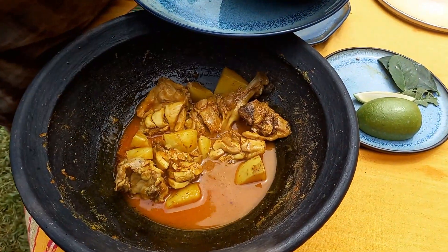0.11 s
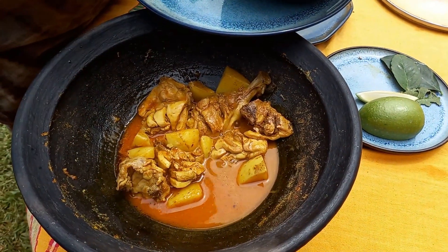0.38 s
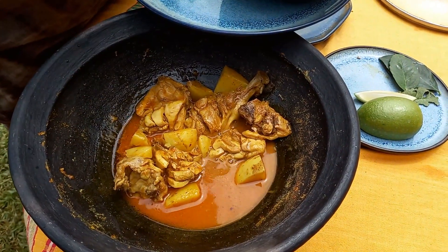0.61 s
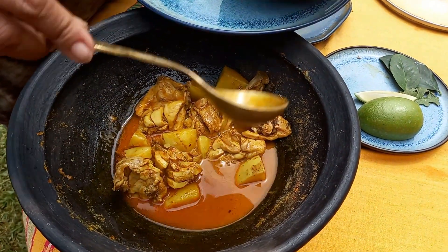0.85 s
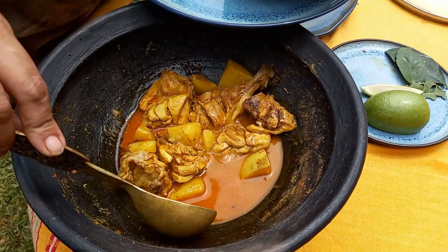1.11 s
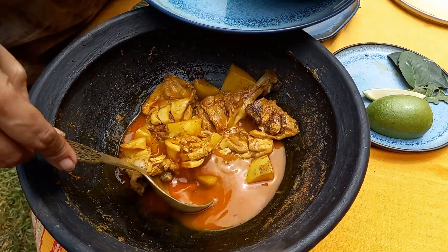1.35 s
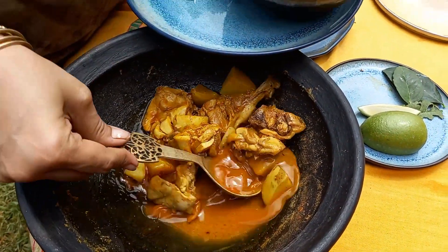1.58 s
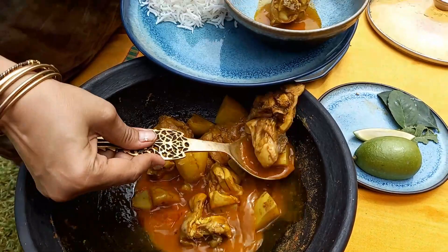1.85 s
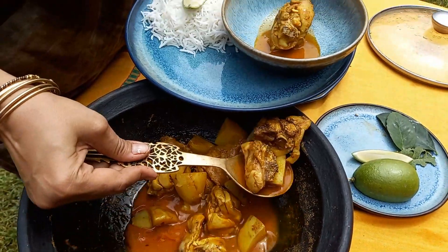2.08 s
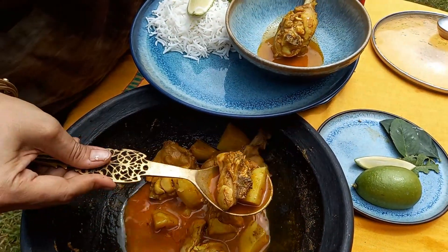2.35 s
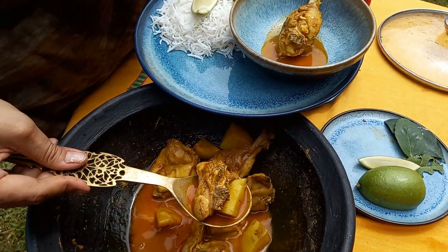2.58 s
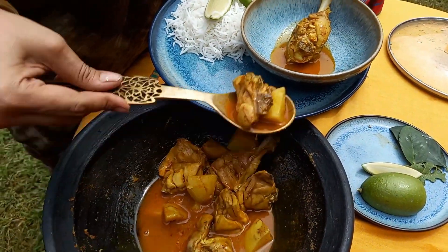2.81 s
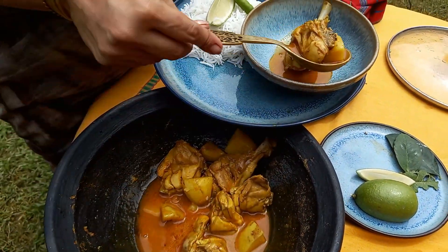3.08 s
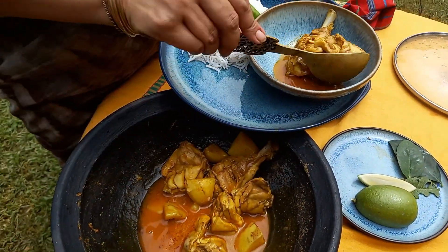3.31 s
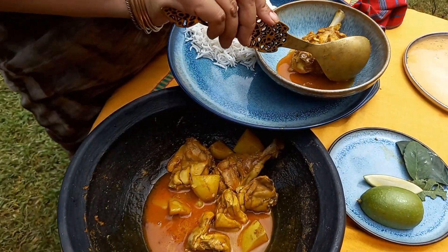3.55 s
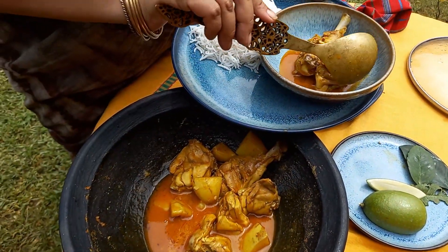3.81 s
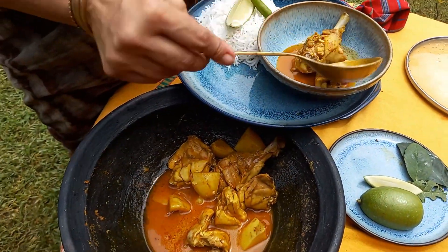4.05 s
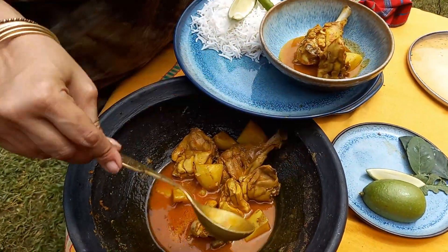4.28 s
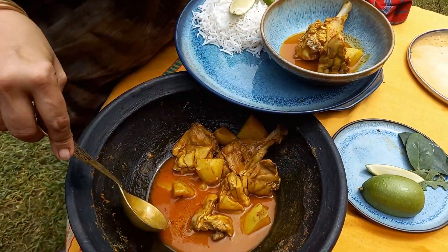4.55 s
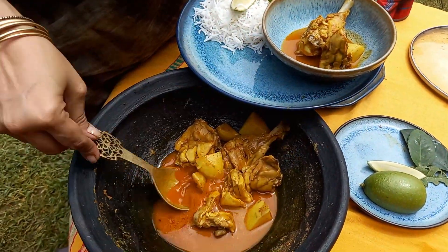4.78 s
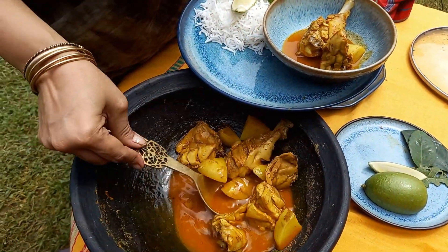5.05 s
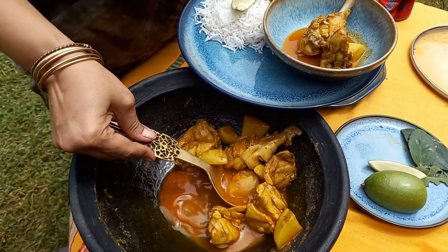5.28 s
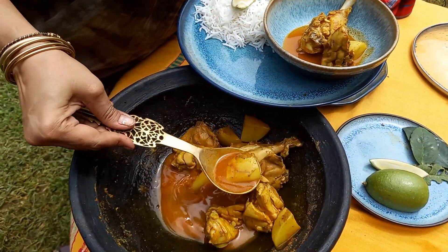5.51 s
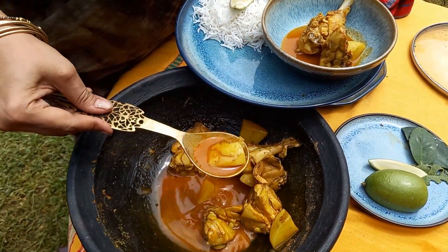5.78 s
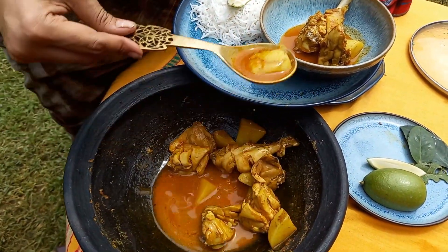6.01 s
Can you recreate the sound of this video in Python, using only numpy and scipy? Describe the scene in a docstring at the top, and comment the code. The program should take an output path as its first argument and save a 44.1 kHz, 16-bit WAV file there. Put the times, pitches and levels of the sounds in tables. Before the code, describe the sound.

A dish clunks down, then a metal ladle knocks and scrapes in a heavy clay pot outdoors, over pulsing cicadas and a late falling bird whistle.

```python
"""A brass ladle knocks and scrapes in a clay pot, close by on a garden table: blows and grit ring its modes.
A dish is set down beside it, ringing modes of its own; sauce and bangles tick and the ladle slips with
short plops, all brief tones. Cloth rustles as crackling hiss, a bird whistles and falls as gliding sines,
faint rough notes sound, and cicadas pulse as three bands of buzzing noise. Far off, a low throb of
sagging tones swells over the quiet noise of the air."""
import sys
import numpy as np
from scipy import signal
from scipy.fft import rfft, irfft, next_fast_len
from scipy.io import wavfile
from scipy.ndimage import uniform_filter1d

SR = 44100
rng = np.random.default_rng(int(sys.argv[2]) if len(sys.argv) > 2 else 0)


def generate_wav(sig):
    """Save sig (samples, or channels by samples) to the path in sys.argv[1] as 16-bit PCM at SR."""
    pcm = np.round(np.clip(np.atleast_2d(sig).T, -1, 1) * 32767).astype(np.int16)
    wavfile.write(sys.argv[1], SR, pcm)


def level_to_linear(level):
    """Convert decibel levels to linear amplitude factors, elementwise."""
    exponent = np.asarray(level, float) / 20
    return 10 ** exponent


N = 270681

# Levels are relative settings, ahead of each source's waver and gain and of the microphone.
# clay pot with the ladle on it, undamped: pitch_hz, level_db, t60_s
POT_MODES = [(356, -14, 0.1), (563.6, -2.5, 0.057), (666, 2.5, 0.041), (825, -7, 0.091), (1240, -8, 0.042),
             (1405, -7.5, 0.029), (1900, -7, 0.049), (1993, -3, 0.052), (2214, 2, 0.029), (2340, 2, 0.029),
             (2400, 1, 0.028), (2700, -0.5, 0.042), (2776, -4, 0.032), (2995, -14, 0.038),
             (3590, -3, 0.012), (4150, -2.5, 0.02), (4350, -9, 0.016), (4830, -5, 0.017),
             (5010, -14, 0.0054), (6250, -10.5, 0.015), (6200, -15, 0.017)]
# ladle knocks on the pot: start_s, level_db, left_minus_right_db, tilt_db_per_octave, body_db
LADLE_KNOCKS = [(1.2198, -15.5, 1, 6.5, 8), (1.222, -23, 2, 6, 6), (1.446, -29.5, 1, -0.5, -2),
                (1.525, -39, -3, 0, -11), (1.542, -30.5, 3, 5, -8), (1.559, -37, 1.5, 4, -3),
                (1.612, -36.5, 0, 3, 0), (1.713, -32.5, 1, 1, -11), (1.799, -40, 0, 2, -7),
                (1.816, -36.5, 1, -5, -13), (1.857, -41, 3, -1, -15), (1.9, -34, 4, 2, -7),
                (1.96, -34.5, 3, -1, -7), (4.729, -9, -1.5, 0, -3), (4.74, -13, -1.5, 4, 2),
                (4.894, -36, -3, 11, -3), (5.249, -39, 1.5, 5.5, 3), (5.8, -41, -1, 8.5, -6)]
# ladle strokes over the clay: start_s, length_s, middle_ring_db, low_ring_above_it_db, high_ring_above_it_db
LADLE_STROKES = [(1.317, .03, -49, -11, 0), (1.352, 0.046, -44.5, 3, 0), (1.41, .015, -50, 3.5, 0),
                 (1.447, 0.032, -43.5, 0, -2.5), (1.537, 0.031, -45.5, -2.5, -5),
                 (1.61, 0.303, -52.5, -21, -3), (1.951, 0.023, -49, -15, -0.5), (4.747, .01, -35, -2, -12),
                 (4.785, 0.039, -49, 3, 8), (4.835, 0.026, -45, 5, 0.5), (4.893, .03, -50, -3, 5),
                 (4.952, 0.14, -53.5, -14, -1.5), (5.148, .01, -59, 2, -16)]
# dish on the table, undamped: pitch_hz, level_db, t60_s
DISH_MODES = [(320, -42, 0.03), (486, -9, 0.064), (614.7, -5.5, 0.037), (876, -11, 0.066),
              (1065, -2.5, 0.037), (1174, -1, .02), (1255, 3.5, 0.022), (1398, 2.5, 0.01697),
              (1565, -6.5, .012), (1847, -3.5, 0.025), (2000, -15.5, 0.048), (2380, -13, 0.037),
              (2910, -18.5, 0.036), (3620, -15.5, 0.017), (4150, -19, 0.0354), (4443, -8, 0.012),
              (4890, -17, 0.014), (5580, -14.5, .015), (5930, -16, 0.012), (6260, -18.5, 0.0228),
              (6585, -18.5, 0.014), (8990, -29, .012)]
# dish set down, settling and nudged: start_s, level_db, left_minus_right_db, tilt_db_per_octave, body_db
DISH_CONTACTS = [(0.017, 0, 0, 4, 0.5), (0.02, -12.5, 0, 2.5, -2), (0.317, -38, 2, 8, 17),
                 (0.34, -32, 2, 0.5, 16.5), (0.358, -36.5, 4, -1.5, 11), (2.443, -39, -1, 4, 12)]
# ladle slips in the scrape and other short plops, most of them low: # start_s, level_db, pitch_hz,
# left_minus_right_db, fade_cycles
SHORT_PLOPS = [(1.348, -29.5, 537, -1.5, 3.9), (1.362, -26, 584, 2, 3), (1.372, -31, 584, -3, 3.3),
               (1.384, -30, 590, -0.5, 2.8), (1.41, -39, 580, 1.5, 3), (1.42, -34, 604, 1.0, 3),
               (1.447, -21.5, 573, -1, 2.6), (1.46, -32, 610, 0.0, 2.8), (1.478, -31, 572, -2, 2.9),
               (1.559, -43, 634, -3.5, 2.5), (4.784, -39, 595, 0, 2.8), (4.79, -28, 606, -3, 3),
               (4.804, -37, 625, -0.5, 2.5), (4.818, -25, 630, -3, 3.8), (4.847, -23.5, 583, -1, 3.9),
               (4.861, -42, 570, -3, 2.3), (4.884, -43, 659, -3.0, 2.8), (1.816, -31.5, 1380, 1.5, 3.7),
               (1.835, -39, 1340, 2.0, 4), (2.444, -36, 800, -2, 4), (2.531, -46, 2240, 11, 6.4),
               (5.149, -47, 2240, -6, 3.2)]
# small wet or metal ticks: start_s, level_db, pitch_hz, left_minus_right_db, fade_cycles
SMALL_TICKS = [(0.2129, -45, 4340, 4, 5), (0.5127, -42, 6580, -5, 5.7), (0.632, -43.5, 6880, -5, 5.8),
               (1.721, -34.5, 6480, 0.0, 5), (1.8442, -39, 6030, -1.5, 5), (1.952, -35, 6200, -2, 6.3),
               (2.0112, -38, 4240, 0.0, 6.4), (2.0741, -40, 6300, -1.5, 5), (2.157, -36, 6260, 1.0, 5.3),
               (2.444, -40, 5500, 0, 5), (2.9052, -40, 5980, -1.5, 4.4), (3.3661, -41, 6140, -5.5, 5),
               (3.4126, -39.5, 4150, -6, 5.8), (1.7284, -35, 9920, 3, 2), (1.7678, -17.5, 11100, 10, 1.9),
               (1.922, -36, 10100, 0.5, 2.4), (1.9744, -38, 11500, 1.0, 2.2), (2.1195, -39, 8480, 3.5, 2.2),
               (2.1304, -48, 9340, 3.0, 2), (2.15, -39, 9330, 11, 2.3), (3.1632, -41, 10500, 2.0, 2.8),
               (5.9214, -46.5, 8090, 1.0, 2)]
# cloth rustle: time_s, level_db, sizzle_db, left_minus_right_db
CLOTH_LEVELS = [(0, -71, -68, -3), (.22, -67.5, -71, -3), (.41, -67, -65.5, -9.5), (.79, -65.5, -64, -6.5),
                (1.1, -58.5, -56.5, -5), (1.21, -63.5, -59, -3), (1.28, -77, -71.5, -3),
                (1.42, -64, -69.5, -1), (1.8, -65.5, -62.5, -3), (2.1, -68.5, -71, 1),
                (2.96, -77, -83, -1.5), (3.25, -68, -65, -9), (3.43, -58.5, -56.5, -10),
                (3.64, -60, -59.5, 0), (3.85, -67, -68, -2), (4.15, -66, -67, -2), (4.5, -66, -69, -1.5),
                (4.7, -70, -75, 2.5), (4.9, -54, -56.5, 5.5), (5.0, -67.5, -62.5, 3),
                (5.28, -61.5, -63.5, 1), (5.4, -69.5, -76, -1), (6.14, -69.5, -73.5, 0)]
# spectrum of the cloth hiss: pitch_hz, density_db (per Hz)
CLOTH_COLOUR = [(880, -45.5), (1500, -12.5), (1960, -8.5), (3180, -8.5), (6240, -5), (8240, -6.5),
                (11700, -1), (16000, -17)]
# bird whistle, one list a call: time_s, pitch_hz, level_db
BIRD_CALLS = [
    [(4.49, 2376, -70), (4.56, 2381, -65), (4.63, 2321, -72)],
    [(4.86, 2311, -60), (5.04, 2281, -54.5), (5.3, 2248, -53.5), (5.64, 2245, -54.5), (5.68, 2226, -68),
     (5.775, 2161, -72), (5.8, 2071, -51), (5.86, 1791, -67), (5.94, 1566, -61), (5.99, 1541, -74),
     (6.09, 1481, -75)],
]
# short faint notes, one rising with the cicadas, one list a note: time_s, pitch_hz, level_db
FAINT_NOTES = [
    [(3.35, 1950, -67), (3.38, 1980, -57), (3.43, 1900, -58)],
    [(3.44, 2250, -66), (3.52, 2490, -58.5), (3.64, 3000, -70)],
]
# cicada choruses: first_pulse_s, period_s, duty (0-1), low_hz, high_hz, top_lag_s, depth_db, edge_fall_db
CICADA_CHORUSES = [(0.19, .367, 0.6, 2165, 3814, 0.12, 14, 2),
                   (0.11, .369, 0.48, 4200, 5700, 0.019, 15.5, 4),
                   (0.35, .624, 0.55, 5900, 7100, 0.0302, 15, 2)]
# their levels: time_s, rising_band_db, middle_band_db, top_band_db
CICADA_LEVELS = [(0, -60.5, -68, -60), (.5, -69.5, -69.5, -66), (1.5, -58, -66, -64), (2, -66, -63.5, -64),
                 (2.8, -64.5, -67.5, -66.5), (3.95, -60, -62, -64.5), (5.1, -59, -57, -62.5),
                 (6.14, -64, -62.5, -67.5)]
# far low throbs: start_s, length_s, level_db, pitch_hz
FAR_THROBS = [(0.256, 0.033, -45, 77), (1.076, .02, -49, 83), (1.461, 0.017, -45.5, 81),
              (2.243, 0.032, -47.5, 71), (2.561, .03, -43, 81.4), (2.624, 0.012, -41.5, 77.5),
              (2.947, 0.076, -41.5, 82.7), (3.335, 0.075, -34.5, 83.8), (3.747, 0.078, -42.5, 76),
              (4.11, 0.043, -33.5, 78), (4.36, .02, -43, 67.6), (4.491, 0.052, -31, 84),
              (4.882, 0.067, -28.5, 82.8), (5.009, 0.015, -39.5, 80), (5.144, .02, -47, 91.4),
              (5.261, 0.067, -32.5, 82.4), (5.383, 0.016, -39, 72), (5.653, 0.068, -33, 82.8),
              (5.775, .02, -51, 97)]
# spectrum of the garden air: pitch_hz, density_db (per Hz)
AIR_COLOUR = [(15, -44), (25, -21.5), (64, -1), (102, -1.5), (185, -13.5), (516, -19), (624, -22.5),
              (1230, -23), (1840, -26.5), (2350, -23.5), (3820, -36.5), (4740, -28.5), (6740, -31),
              (14400, -46.5), (16000, -54)]
# far rumble: time_s, level_db
RUMBLE_LEVELS = [(0, -61), (.56, -72), (.73, -59.5), (1.57, -52), (2.07, -65), (3.3, -50.5), (3.7, -58.5),
                 (4.4, -57), (4.75, -58), (4.87, -53), (5.73, -52), (6.14, -59)]

T = np.arange(N) / SR  # s
ALIKE_HZ = 701  # left and right part ways above this


def unit(x):
    """Scale to rms 1."""
    return x / np.sqrt(np.mean(x ** 2))


def pan(db):
    """Left and right gains for a level difference."""
    return level_to_linear(np.array([db, -db]) / 2)


def curve(rows):
    """Columns of a table at every sample, held at its ends."""
    s, *columns = np.transpose(rows)
    return [np.interp(T, s, c) for c in columns]


def gate(rows, fade_s):
    """1 while a table lasts, fading out at both ends."""
    first, last = rows[0][0], rows[-1][0]
    return np.interp(T, [first - fade_s, first, last, last + fade_s], [0, 1, 1, 0])


def walk(rate):
    """Random levels held 1 / rate s and slewed twice; spread near 1."""
    hold = int(SR / rate)
    steps = np.repeat(rng.standard_normal(N // hold + 1), hold)
    return unit(uniform_filter1d(uniform_filter1d(steps, hold), hold)[:N])


def band(x, lo_hz, hi_hz, order):
    """Butterworth band-pass."""
    return signal.sosfilt(signal.butter(order, [lo_hz, hi_hz], "band", fs=SR, output="sos"), x)


def noise(colour):
    """Two-channel noise of a spectrum, alike in the bass only."""
    size = next_fast_len(N)
    hz = np.fft.rfftfreq(size, 1 / SR) + 1
    colour_hz, colour_db = np.transpose(colour)
    density = level_to_linear(np.interp(np.log(hz), np.log(colour_hz), colour_db))
    mid, side = rfft(rng.standard_normal((2, size))) * density
    alike = 0.91 / (1 + (hz / ALIKE_HZ) ** 2)
    mid, side = mid * np.sqrt(1 + alike), side * np.sqrt(1 - alike)
    return unit(irfft(np.array([mid + side, mid - side]), size)[:, :N])


def add(out, s, sound):
    """Mix a sound in at a time."""
    i = int(s * SR)
    out[:, i:i + sound.shape[1]] += sound[:, :N - i]


def blows(events, modes, scatter_db, crack_db, damping):
    """Each blow is a short crack that rings every mode; the two microphones hear high modes in unrelated phase."""
    out, t = np.zeros((2, N)), np.arange(SR // 5) / SR
    hz, db, t60 = np.transpose(modes)[:, :, None]
    chance = rng.standard_normal((len(events), 3, len(modes), 1))
    cracks = band(rng.standard_normal((len(events), 2, len(t))), 703, 6800, order=3) * np.exp(-t / 0.0014)
    apart = 1.77 / (1 + (2.35 * ALIKE_HZ / hz) ** 4)
    decay_db = 60 * damping * t / t60
    onset = 1 - np.exp(-t / 0.000528)
    for (s, level_db, pan_db, tilt, body_db), (size, left, right), crack in zip(events, chance, cracks):
        # the body is the modes under 1 kHz, woken by a heavier contact
        woken_db = body_db / (1 + (hz / 1000) ** 6) + tilt * np.log2(hz / 1500)
        ring = level_to_linear(db + woken_db + scatter_db * size - decay_db) * onset
        both = np.array([np.sum(ring * np.sin(2 * np.pi * hz * t + lag * apart), axis=0)
                         for lag in (left, right)])
        both = both / np.sqrt(np.mean(both[:, :SR // 300] ** 2))  # rms 1 over the first 1/300 s
        both = both + level_to_linear(crack_db + 1.2 * tilt) * crack
        add(out, s + .0009, level_to_linear(level_db - 7) * pan(pan_db)[:, None] * both)
    return out


def knocks():
    """The ladle's blows wake the modes of the clay pot."""
    return blows(LADLE_KNOCKS, POT_MODES, scatter_db=1.2, crack_db=-2.2, damping=1.25)


def scrape():
    """Grit catches in uneven bursts and feeds the pot's modes, damped by the pressed ladle."""
    rise_s, fade_db_per_s = .015, 300
    grit = rng.standard_normal((2, N)) * level_to_linear(2.33 * rng.exponential(size=N))
    # coarse grains catch a few hundred times a second
    catches = rng.random(N) < 350 / SR
    grit = grit * (1 + 4 * signal.lfilter([1], [1, -.97], catches))
    low, middle, high = parts = np.zeros((3, 2, N))
    for hz, db, t60 in POT_MODES:
        pole = np.exp(-np.log(1000) / (t60 * 0.74 * SR))
        turn = 2 * np.pi * hz / SR
        # every mode is caught by its own patch of grit
        patch = grit * level_to_linear(3.35 * walk(75))
        ring = signal.lfilter([np.sin(turn)], [1, -2 * pole * np.cos(turn), pole ** 2], patch)
        if hz < 1000:
            # low ring favours modes near 600 Hz, alike on both sides
            low += level_to_linear(db - 47.0 * abs(np.log2(hz / 600))) * ring[0]
        elif hz <= 3300:
            middle += level_to_linear(db) * ring
        else:
            high += level_to_linear(db) * ring
    parts = [unit(part) for part in parts]
    bare_grit = unit(band(grit * level_to_linear(2.3 * walk(120)), 2700, 7500, order=2))
    parts[2] = unit(parts[2] + 1.5 * bare_grit)
    power = 0
    for s, length, db, low_db, high_db in LADLE_STROKES:
        # a stroke bites, holds, then dies away
        bite = np.clip((T - s) / rise_s + 1, 0, 1)
        shape = bite * level_to_linear(-fade_db_per_s * np.maximum(T - s - length, 0))
        power = power + (level_to_linear(db + np.array([[low_db], [0], [high_db]])) * shape) ** 2
    return sum(size * part for size, part in zip(np.sqrt(power), parts)) * pan(1.5)[:, None]


def set_down():
    """The dish meets the table and rings its own modes."""
    return blows(DISH_CONTACTS, DISH_MODES, scatter_db=1.0, crack_db=-1.995, damping=1.01)


def grains(events, glide):
    """A few cycles of one tone that swells within about a cycle, then fades; glide bends it up."""
    out, t = np.zeros((2, N)), np.arange(SR // 20) / SR
    for (s, level_db, hz, pan_db, cycles), lag in zip(events, rng.standard_normal((len(events), 2, 1))):
        fade = np.exp(-t * hz / cycles)
        size = 1.55 * level_to_linear(level_db) * fade * (1 - np.exp(-t * hz / 1.16))
        # the two sides differ in phase, more so at high pitch
        phase = 2 * np.pi * hz * t * (1 + glide * (1 - fade)) + lag * hz / (hz + 4 * ALIKE_HZ)
        add(out, s, pan(pan_db)[:, None] * size * np.sin(phase))
    return out


def plops():
    """Short tones that bend up as they fade."""
    return grains(SHORT_PLOPS, glide=0.02)


def ticks():
    """Sauce and bangles tick in very short tones of steady pitch."""
    return grains(SMALL_TICKS, glide=0)


def echoes(x, t60_s, db):
    """Table, crockery and walls send back a short diffuse tail, alike left and right in the bass."""
    t = np.arange(SR // 3) / SR
    tail = noise([(100, 0.5), (1000, -1.5), (5000, -2.0), (16000, -9.0)])[:, :len(t)]
    tail = tail * level_to_linear(-60 * t / t60_s) * (t > .004)
    tail = tail / np.sqrt(np.sum(tail ** 2) / 2)
    return level_to_linear(db) * signal.fftconvolve(x, tail, axes=1)[:, :N]


def rustle():
    """Cloth hisses with a fine crackle; its finest sizzle comes and goes apart from the rest."""
    db, sizzle_db, pan_db = curve(CLOTH_LEVELS)
    hiss = noise(CLOTH_COLOUR) * level_to_linear(1.46 * rng.exponential(size=N))
    body = unit(band(hiss, 3600, 11000, order=2)) * level_to_linear(db + 6.5)
    sizzle = unit(band(hiss, 11000, 16500, order=3)) * level_to_linear(sizzle_db + 5.0 + 1.55 * walk(21))
    return (body + sizzle) * level_to_linear(1.6 * walk(40)) * pan(pan_db)


def tones(calls, fade_s, waver_db, rate, pan_db, blur_hz):
    """Sines that follow pitch and level, wavering in size; a quick wobble of pitch blurs them."""
    out, wobble = 0, walk(900)
    for rows in calls:
        hz, db = curve(rows)
        # echoes off leaves smear a gliding note more than a held one
        blur = blur_hz + .014 * np.abs(np.gradient(hz)) * SR
        sine = np.sin(2 * np.pi * np.cumsum(hz + blur * wobble) / SR)
        out = out + gate(rows, fade_s) * level_to_linear(db) * np.sqrt(2) * sine
    return out * level_to_linear(waver_db * np.array([walk(rate), walk(rate)])) * pan(pan_db)[:, None]


def bird():
    """A bird's falling whistles: sines that glide downwards."""
    return tones(BIRD_CALLS, fade_s=0.033, waver_db=1.8, rate=40, pan_db=1.9, blur_hz=12)


def faint_notes():
    """Faint notes made rough by a wide blur of pitch, one rising with the cicadas."""
    return tones(FAINT_NOTES, fade_s=0.041, waver_db=5.4, rate=150, pan_db=2.1, blur_hz=95)


def cicadas():
    """Each chorus is a row of narrow buzzes that swell once a period, the higher ones later."""
    out, singers = 0, 9  # buzzes in a chorus
    levels = curve(CICADA_LEVELS)
    for (first, period, duty, lo_hz, hi_hz, lag, depth_db, fall_db), db in zip(CICADA_CHORUSES, levels):
        edges = np.linspace(lo_hz, hi_hz, singers + 1)
        for k in range(singers):
            start = first + lag * (k / singers) ** 1.42
            part = np.clip((T - start) / period % 1 / duty, 0, 1)
            swell = (np.sin(np.pi * part ** 0.56) + 1e-9) ** 0.54
            edge_db = fall_db * (2 * (k + .5) / singers - 1) ** 2
            buzz = unit(band(rng.standard_normal((2, N)), edges[k], edges[k + 1], order=2))
            out = out + buzz / np.sqrt(singers) * level_to_linear(db - edge_db + depth_db * (swell - 0.5))
    return out


def throbs():
    """A low tone that swells, holds and fades while it sags, with a rough edge of the same shape."""
    rise_db_per_s, droop_db_per_s, fade_db_per_s = 509, 25, 403  # it droops while it holds
    sag_hz_per_s = 40
    tone = size = 0
    for s, length, db, hz in FAR_THROBS:
        t = T - s
        rise_db = rise_db_per_s * np.maximum(-t, 0)
        droop_db = droop_db_per_s * np.clip(t, 0, length)
        fade_db = fade_db_per_s * np.maximum(t - length, 0)
        swell = level_to_linear(db - rise_db - droop_db - fade_db)
        phase = 2 * np.pi * (hz - sag_hz_per_s * t / 2) * t + 2 * np.pi * rng.random()
        tone = tone + swell * np.sqrt(2) * np.sin(phase)
        size = size + swell
    tone = tone * level_to_linear(0.96 * np.array([walk(25), walk(25)])) * pan(-3.5)[:, None]
    edge = unit(band(rng.standard_normal(N), 30, 174, order=2))
    return tone + level_to_linear(-11) * size * edge


def air():
    """Garden air: a hiss whose level drifts slightly, and a far rumble that comes and goes."""
    rumble = unit(band(noise(AIR_COLOUR), 69, 250, order=2)) * level_to_linear(curve(RUMBLE_LEVELS)[0])
    return noise(AIR_COLOUR) * level_to_linear(-50.5 + 0.81 * walk(2)) + rumble


def scene():
    """Near table sounds with their tail, then the garden; the far bass reaches the right side first."""
    table = knocks() + scrape() + set_down() + plops() + ticks()
    near = table + echoes(table, t60_s=0.21, db=-17.5) + rustle()
    far = throbs() + air() * pan(-0.63)[:, None]
    far[0] = np.roll(far[0], 9)  # left lag in samples
    return near + bird() + faint_notes() + cicadas() + far


def low_pass(x):
    """Removes everything above the highest recorded frequency."""
    return signal.sosfilt(signal.butter(12, 16970, fs=SR, output="sos"), x)


def record(dry):
    """The microphone cuts the deepest bass, dips near 4 kHz and rounds the loudest peak."""
    cut = signal.sosfilt(signal.butter(4, 48, "high", fs=SR, output="sos"), dry)
    cut = cut - 0.28 * band(cut, 3900, 3920, order=1)
    mix = 1.476 * np.tanh(cut / 1.524)
    return low_pass(mix)


dry = scene()
out = record(dry)
generate_wav(out)
```